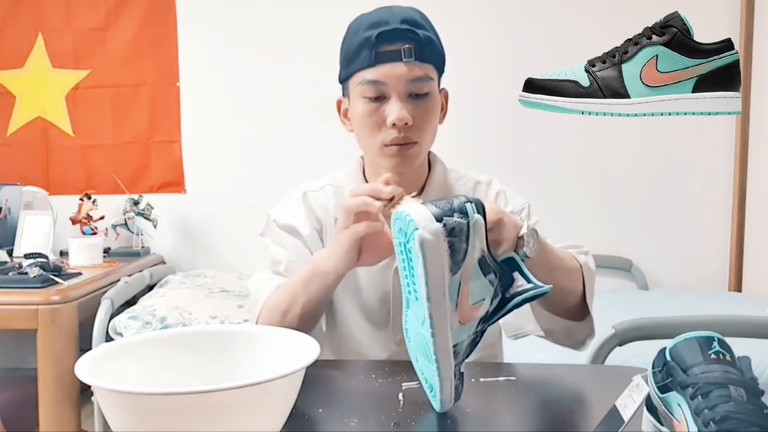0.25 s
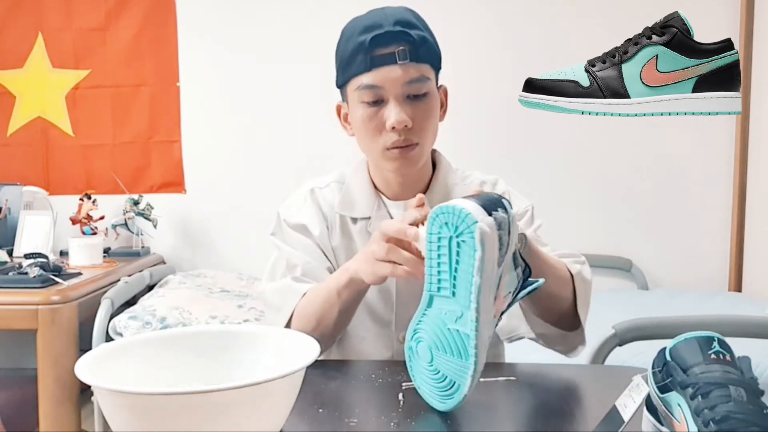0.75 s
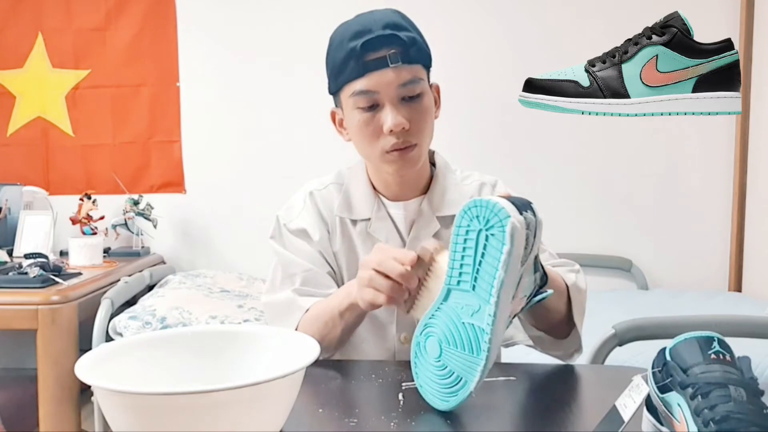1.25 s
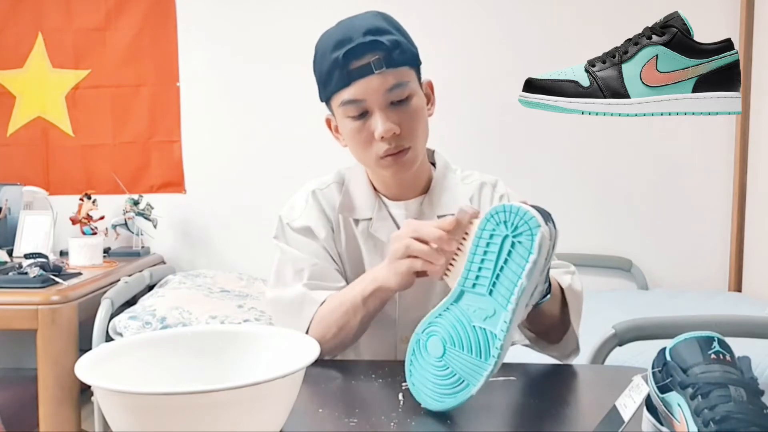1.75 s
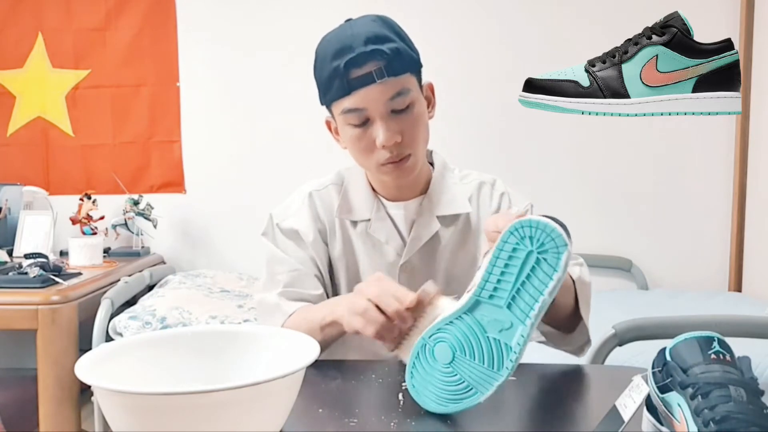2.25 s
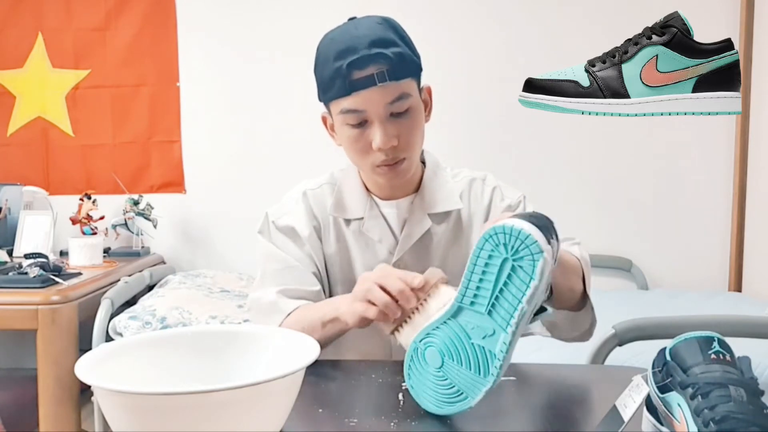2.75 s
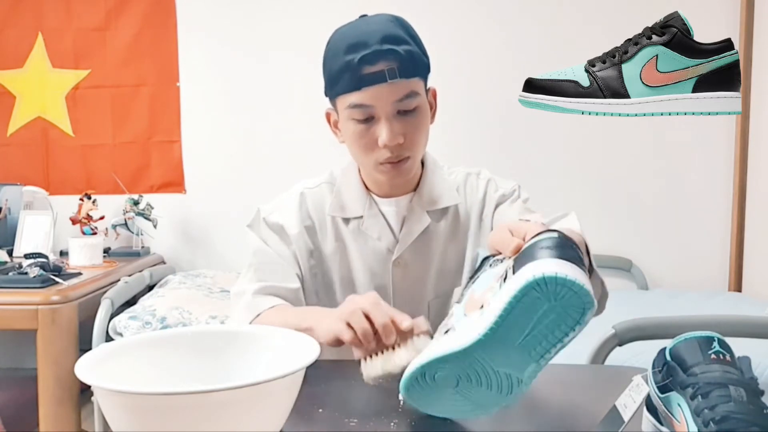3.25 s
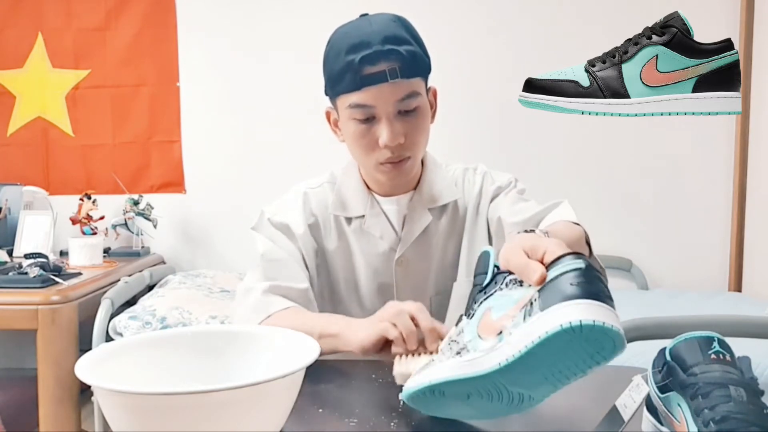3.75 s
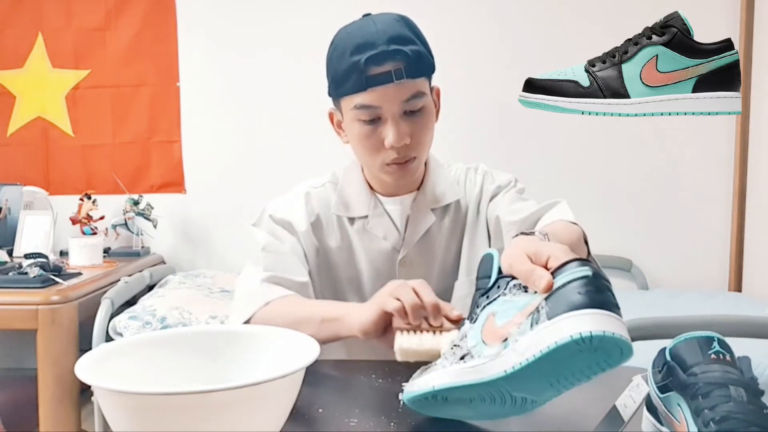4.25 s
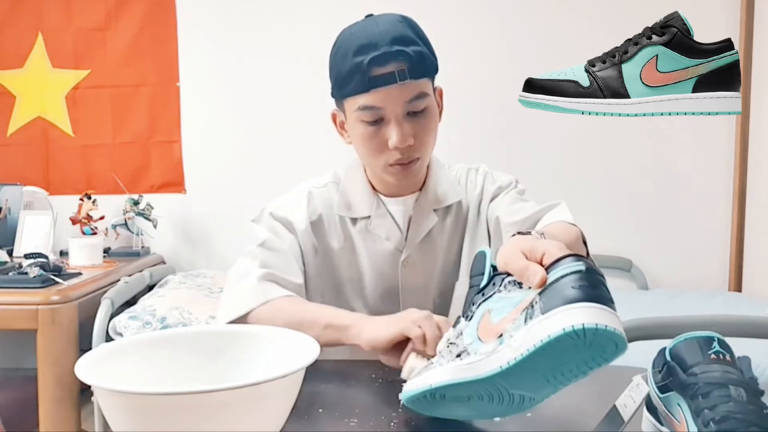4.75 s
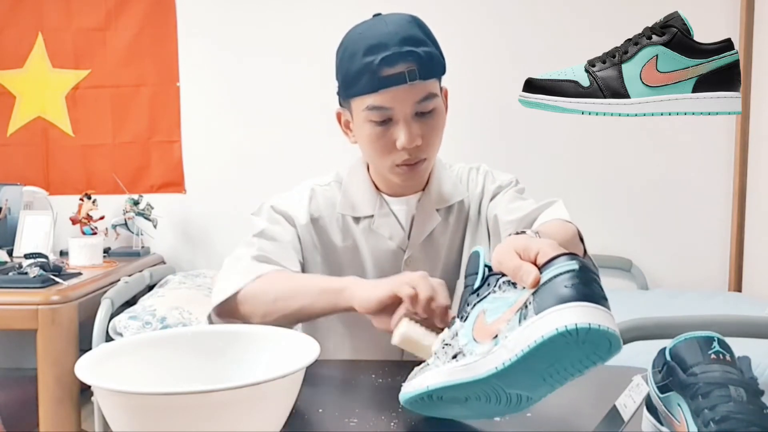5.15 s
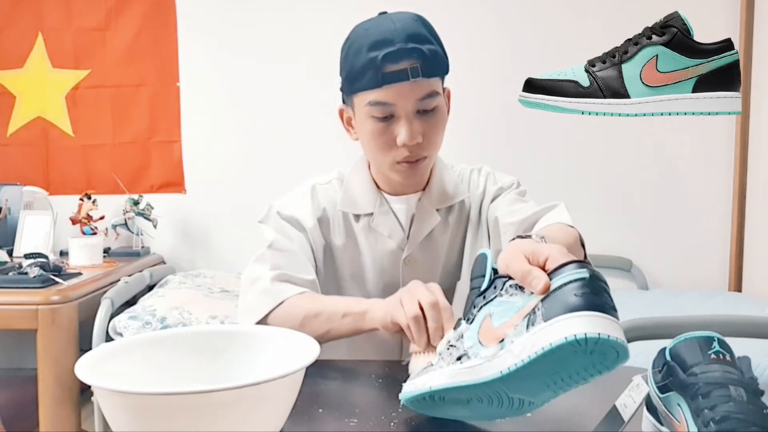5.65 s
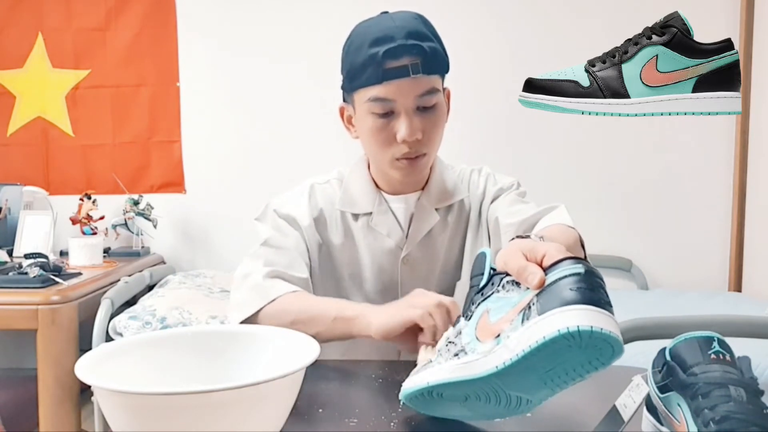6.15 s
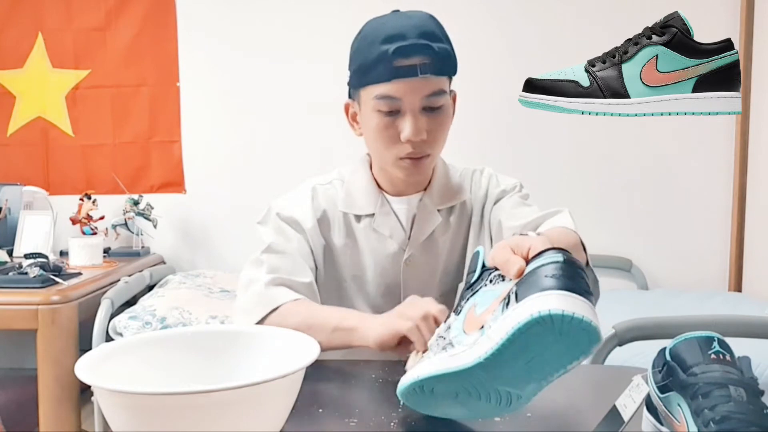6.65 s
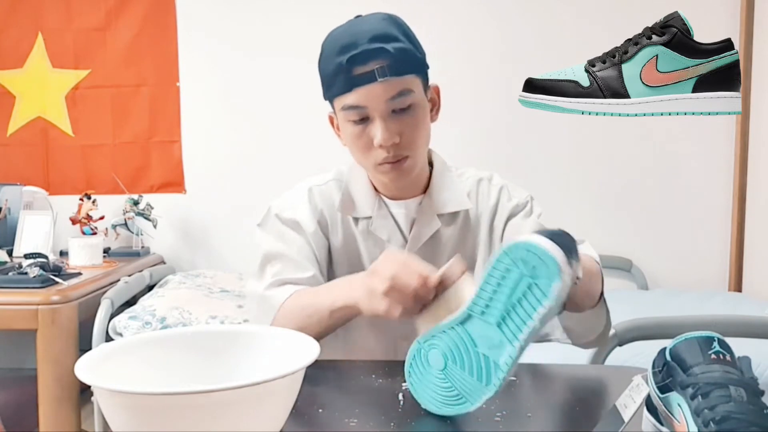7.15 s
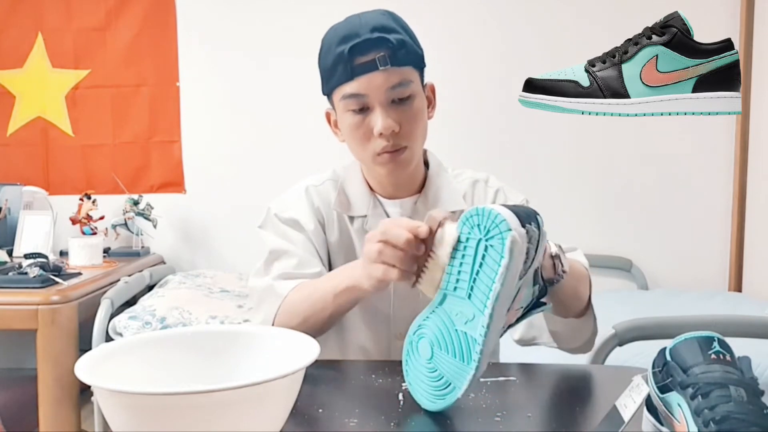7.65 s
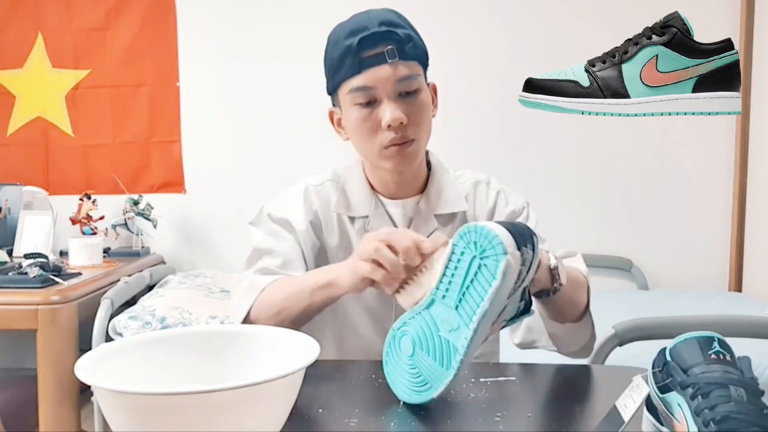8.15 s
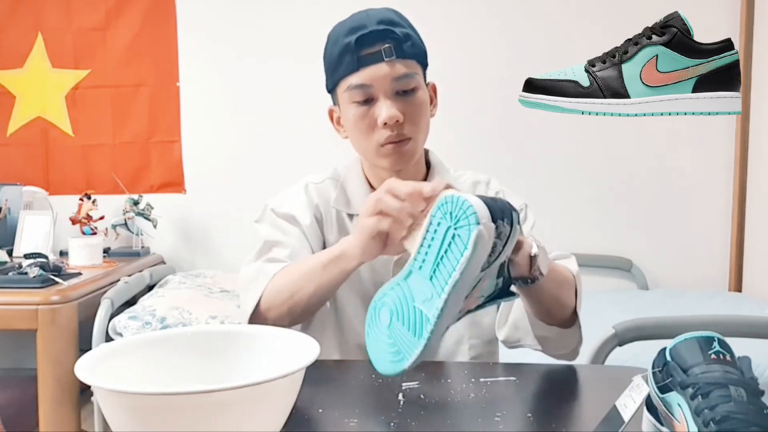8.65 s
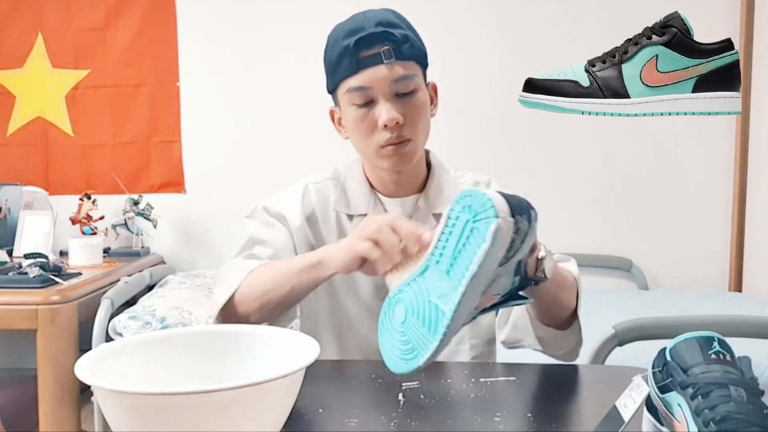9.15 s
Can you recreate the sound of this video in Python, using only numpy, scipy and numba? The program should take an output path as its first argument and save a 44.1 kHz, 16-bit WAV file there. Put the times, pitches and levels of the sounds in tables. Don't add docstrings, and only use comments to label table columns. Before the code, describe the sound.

A stiff wet brush rasps over a rubber-soled shoe, gritty and slightly fizzy, with a hollow body beneath and soft low table rumble. Nearly silent first, then lively strokes with one heavy thump, muffled heel strokes with small clacks, a quieter gappy stretch, and finally crisp vigorous scrubbing. Close and dry in a quiet indoor room, source a little left.

```python
import sys
import numpy as np
from scipy import signal
from scipy.fft import rfft, irfft, next_fast_len
from scipy.io import wavfile
from scipy.ndimage import uniform_filter1d
from numba import njit

SR = 44100
rng = np.random.default_rng(int(sys.argv[2]) if len(sys.argv) > 2 else 0)


def rack_gain(trim_db):
    fader = np.asarray(trim_db, float)
    return 10 ** (fader / 20)


def wrap_up_sound(samples):
    columns = np.atleast_2d(samples).T
    tamed = np.clip(columns, -1, 1)
    steps = np.round(tamed * 32767).astype(np.int16)
    wavfile.write(sys.argv[1], SR, steps)


N = 414981

# (frequency [Hz], density [dB per Hz])
ROOM_AIR = [(30, 8), (300, -15), (700, -61), (1500, -42), (5000, -24), (15000, -47)]
# (time [s], peak [dB], ring [Hz], t60 [s])
SOFT_BUMPS = [(0.002, -59.5, 47.5, 0.3), (0.514, -59, 500, 0.04), (0.807, -56, 490, 0.035),
              (1.682, -42, 303, .12), (1.7, -41, 223, .12), (1.715, -39, 364, 0.13),
              (1.745, -38.5, 490, 0.18), (1.78, -36, 495, 0.055), (2.68, -48, 202, 0.054),
              (3.897, -24, 697, 0.018), (3.921, -26.5, 320, 0.029), (4.227, -33.5, 406, 0.044),
              (4.247, -33.5, 483, 0.064), (4.268, -42, 528, .08), (4.535, -35, 852, 0.047),
              (4.548, -35, 1180, 0.04), (4.601, -41, 320, 0.044), (6.018, -56, 240, 0.092),
              (6.111, -54, 242, 0.067), (6.17, -50, 514, 0.025), (6.187, -44, 400, 0.027),
              (6.567, -43.5, 570, 0.047), (6.58, -46, 394, 0.036), (6.618, -36, 680, 0.025),
              (6.775, -38, 262, 0.029), (6.87, -44, 260, 0.041), (7.233, -45, 360, .05),
              (7.83, -37, 830, 0.048), (7.878, -35, 800, 0.037)]
# (time [s], peak [dB], ring [Hz], t60 [s], crack re ring [dB])
HARD_BUMPS = [
    (2.792, -33, 700, 0.021, -18),
    (3.9015, -28, 341, 0.036, 12),
    (5.689, -37, 372, 0.044, -8),
    (6.2, -41, 457, 0.049, -11),
]
HANDLING_STROKES = [(.04, .08, -84, 13, -10), (.17, .1, -88, 4, -9), (.27, .04, -79, 7, -12),
                    (.325, .045, -72.5, 4, -15), (.385, .045, -78, 8, -9), (.45, .04, -69.5, 6, -13),
                    (.52, .03, -75, 13, -9), (.58, .06, -62.5, 3, -8), (.68, .05, -73, 1, -2),
                    (.75, .05, -71, 5, -4), (.815, .04, -71, 5, -5), (.885, .05, -67, 7, -11),
                    (.98, .05, -71, 8, -11)]
SIDE_STROKES = [(1.118, 0.07, -51, -3.5, -9), (1.292, 0.13, -46.0, -6, -10.5),
                (1.431, 0.088, -39.8, -4, -10.5), (1.607, 0.068, -41, -7, -10.5),
                (1.768, 0.12, -40, -3.0, -10), (1.975, 0.064, -43.5, -2.5, -7.3),
                (2.143, 0.089, -41.5, 0.3, -9), (2.331, 0.054, -46, -4.5, -12),
                (2.475, 0.078, -41.5, -1.5, -8.5), (2.61, 0.068, -53.5, 0.3, -8.5),
                (2.804, 0.07, -43, 2.5, -8), (2.926, 0.097, -50, 1, -8.1), (3.086, 0.05, -43.6, 1, -11),
                (3.196, 0.074, -50, 2, -11.5)]
HEEL_STROKES = [(3.38, 0.064, -50.5, 3, -15), (3.502, 0.07, -48.5, 0.9, -11),
                (3.676, 0.063, -45, 1.5, -14.5), (3.808, 0.066, -47.5, -1, -14.5),
                (3.946, 0.074, -46, 1, -17), (4.1, 0.095, -47.5, .9, -14), (4.303, 0.078, -48, 1.5, -15),
                (4.436, 0.082, -48.5, -0.5, -16), (4.59, .1, -46.5, -0.3, -17), (4.7, 0.11, -53.5, 7, -9.5),
                (4.79, 0.085, -51, -10, -17), (4.898, 0.055, -57, 2, -11)]
SLOW_STROKES = [(5.07, 0.049, -51.5, -1.5, -15.5), (5.13, 0.078, -54, 1, -17), (5.32, 0.085, -66.5, 7, -22),
                (5.451, 0.11, -56, 4.5, -15.5), (5.565, 0.071, -56, 2, -12),
                (5.738, 0.063, -57.5, 5, -18.5), (5.831, .07, -53, 4, -8), (5.908, 0.059, -51, 0.5, -10.5),
                (6.03, 0.034, -72, 1, -14), (6.12, 0.061, -81.5, 3.5, -15), (6.2, 0.022, -74, 18.5, -13),
                (6.302, 0.063, -53.5, 4, -14.5), (6.388, 0.089, -50, -2.5, -17),
                (6.58, 0.038, -67.5, 10, -5.5), (6.657, 0.042, -47, -3.5, -13),
                (6.723, 0.052, -49, -2, -8.5), (6.8, 0.08, -72, 7.5, -11), (6.93, 0.15, -71.5, 9, -6)]
TOE_STROKES = [(7.028, 0.088, -51.5, 2, -3.5), (7.093, 0.056, -39.5, -2, -9.5),
               (7.279, 0.057, -42, -2.5, -7), (7.478, 0.074, -40, -6, -9), (7.707, 0.11, -42, -5, -11),
               (7.825, 0.062, -44.5, -7, -9), (7.902, 0.038, -41, -16, -11.5), (7.992, 0.1, -40, -6, -18),
               (8.101, 0.064, -41.5, -7.5, -16.5), (8.201, 0.14, -44, -13, -13),
               (8.357, 0.083, -39, -8.5, -16), (8.522, 0.077, -40.5, -10, -14.5),
               (8.71, 0.12, -40.5, -6.5, -17), (8.804, 0.073, -42, -23, -13), (8.908, 0.043, -44, -6, -14),
               (9.064, 0.13, -37, -11, -16.5), (9.125, 0.065, -44, -4.5, -9.5),
               (9.27, 0.091, -41.5, -6.5, -14.5), (9.391, 0.058, -40, -9, -18.5)]
# (time [s], bristle ring re scrape [dB], bristle ring [Hz], panel under the brush [Hz],
# panel re cavity [dB], weight of the sole on the table [dB])
BRUSH_PLACE = [(0, -2, 2720, 576, 18, -16.5), (.95, 1, 3020, 476, 34, -20.5), (1.25, 0, 3030, 590, 3, -18),
               (1.45, 2.5, 2950, 470, 8.5, -14.5), (2.1, 1.5, 3150, 497, 1, -13),
               (2.6, 1, 3200, 613, 3, -8.5), (3.1, -4, 3010, 590, -2, -9.5), (3.75, -3, 3030, 647, -1, -14),
               (4.0, -3, 2940, 458, 3, -5.5), (4.45, -6, 3080, 754, -3.5, -17),
               (5.2, -2.5, 3030, 600, -0.5, -17), (5.72, -5, 3160, 435, -1.5, -11),
               (6.7, -7, 3100, 635, 0.5, -8.5), (7.15, 2, 3230, 510, -3, -9.5),
               (7.8, 3, 2950, 670, -5, -15), (8.07, 0, 2760, 403, 11, -6.5),
               (8.3, 0.5, 2790, 480, 12, -21.5), (9.41, 1.5, 2790, 494, 1, -24)]
# (frequency [Hz], density [dB per Hz])
SCRAPE = [(850, 6), (1250, 4.5), (1700, 8.5), (2300, 8), (3300, -9.5), (4500, 2), (6000, -8.5), (8000, -20)]
# (frequency [Hz], density [dB per Hz])
WET_FIZZ = [(4000, 3), (5500, 4.5), (7000, 0), (8500, -7), (11000, -7.5), (13500, -14), (15500, -14.5)]
# (frequency [Hz], width [Hz], level [dB])
SHOE_MODES = [(320, 137, 7.5), (425, 18, -32), (465.3, 25, 11), (570, 17, 7), (680, 200, 4),
              (680, 220, -15.5), (986, 170, -15), (1376, 460, 1)]
# (frequency [Hz], width [Hz], level [dB])
RUBBED_TABLE = [(51.7, 39, -10), (82, 7.5, -2), (119.5, 13.5, -1.5), (151, 22, -4), (240, 91, -6)]
# (time [s], strength [dB])
KNOCKS = [(1.6845, -13), (2.676, -36), (2.822, -39), (2.957, -41), (3.1, -38), (4.545, -43), (4.595, -41),
          (0.57, -54), (2.3, -43), (3.19, -42), (8.05, -42)]
# (frequency [Hz], width [Hz], level [dB], direction [sign])
STRUCK_TABLE = [(48, 4, -24, 1), (87.6, 4.5, -14, -1), (116.8, 9, .5, -1), (160.7, 12.8, -.6, 1),
                (226, 16, -2, -1), (266, 15, 6, 1)]
# (frequency [Hz], level re direct [dB])
SCATTER = [(60, 20), (300, -12.5), (1000, -3), (3000, 0.5), (8000, 6.5), (15000, 16)]
# (frequency [Hz], level re direct [dB])
ECHO = [(60, -24), (300, -17), (1000, -15), (3000, -16), (15000, -20)]

LEFT_DB = 1.4


def rms_one(x):
    return x / np.sqrt(np.mean(x ** 2) + 1e-20)


def colour(x, points, lag_s=0.):
    size = next_fast_len(N + 4096)
    hz = np.arange(size // 2 + 1) * SR / size + 1e-3
    at, db = np.transpose(points)
    octaves_beyond = np.maximum(np.log2(at[0] / hz), 0) + np.maximum(np.log2(hz / at[-1]), 0)
    gain = rack_gain(np.interp(np.log(hz), np.log(at), db) - 24 * octaves_beyond)
    delay = np.exp(-2j * np.pi * hz * lag_s)
    return irfft(rfft(x, size) * gain * delay, size)[..., :N]


def drift(rate):
    r = np.exp(-2 * np.pi * rate / SR)
    noise = rng.standard_normal(N + 8000)
    return rms_one(signal.lfilter([1], [1, -2 * r, r * r], noise)[8000:])


def in_time(rows):
    s, *columns = np.transpose(rows)
    return [np.interp(np.arange(N) / SR, s, c) for c in columns]


def body(force, modes):
    out = 0
    for k, (hz, width, db) in enumerate(modes):
        r = np.exp(-np.pi * width / SR)
        poles = [1, -2 * r * np.cos(2 * np.pi * hz / SR), r * r]
        out = out + (-1) ** k * rack_gain(db) * signal.lfilter([1 - r, 0, r - 1], poles, force)
    return out


@njit
def gliding(x, hz, r, rate):
    y = np.zeros_like(x)
    for i in range(2, len(x)):
        drive = (1 - r[i]) * (x[i] - x[i - 2])
        y[i] = drive + 2 * r[i] * np.cos(2 * np.pi * hz[i] / rate) * y[i - 1] - r[i] * r[i] * y[i - 2]
    return y


def room_air():
    return rack_gain(-79) * rms_one(colour(rng.standard_normal((2, N)), ROOM_AIR))


def bumps():
    out = np.zeros(N + 8192)
    t = np.arange(8192) / SR
    band = signal.butter(5, [500, 3600], "band", fs=SR, output="sos")
    crack = signal.sosfilt(band, 2.4 * (t == 0))
    # crack re ring [dB] (soft only), attack [s], brightness
    soft = [row + (-24, .003, .55) for row in SOFT_BUMPS]
    hard = [row + (.0011, 1) for row in HARD_BUMPS]
    for s, db, hz, t60, crack_db, attack_s, bright in soft + hard:
        overtones = .45 * np.sin(2 * np.pi * 1.7 * hz * t) + .35 * np.sin(2 * np.pi * 2.6 * hz * t)
        ring = np.sin(2 * np.pi * hz * t) + bright * overtones
        envelope = rack_gain(-60 * t / max(t60, .005)) * (1 - np.exp(-t / attack_s))
        out[round(s * SR):][:8192] += rack_gain(db + 4.5) * (ring * envelope + rack_gain(crack_db) * crack)
    return out[:N]


def strokes():
    rows = HANDLING_STROKES + SIDE_STROKES + HEEL_STROKES + SLOW_STROKES + TOE_STROKES
    s, fade_s, db, shoe_db, fizz_db = np.transpose(rows)[:, :, None]
    t = np.arange(0, N + 64, 64) / SR
    haste = np.where(t < s, 1.105, 1 / 1.105)
    fade_db = -10 * np.abs((t - s) / np.clip(fade_s, .02, .15) * haste) ** 1.87
    levels = []
    for re_db, share in ((0, 1), (shoe_db, 0.87), (fizz_db, 1.16)):
        power = np.sum(rack_gain(2 * (db + re_db + share * fade_db)), axis=0)
        levels.append(np.interp(np.arange(N) / SR, t, 10 * np.log10(power + 1e-11)))
    return levels


def slips(per_s, spread_db, clump_db, clump_rate):
    sizes = rack_gain(spread_db * np.minimum(rng.exponential(1, N), 5)) * rng.choice([-1, 1], N)
    let_go = rng.random(N) < per_s / SR
    return sizes * let_go * rack_gain(clump_db * drift(clump_rate))


def bristles(ring_hz, ring_db, fizz_db):
    force = slips(9000, spread_db=1.0, clump_db=0.04, clump_rate=90)
    hz = ring_hz * rack_gain(1.03 * drift(30))
    width_hz = 1200 * (ring_hz / 3000) ** 2.2
    r = np.exp(-np.pi * width_hz / SR)
    once = gliding(force, hz, r, SR)
    ring = rack_gain(ring_db) * rms_one(gliding(once, hz, r, SR))
    scrape = (ring + rms_one(colour(force, SCRAPE))) / np.sqrt(1 + rack_gain(2 * ring_db))
    return scrape + rack_gain(fizz_db + 1.5) * rms_one(colour(force, WET_FIZZ))


def shoe(panel_hz, panel_db):
    small = signal.butter(4, [280, 1700], "band", fs=SR, output="sos")
    drag, rub = (signal.sosfilt(small, slips(2500, spread_db=2.5, clump_db=2.0, clump_rate=10.6))
                 for _ in range(2))
    radius = np.full(N, np.exp(-np.pi * 170 / SR))
    panel = rack_gain(panel_db) * rms_one(gliding(rub, panel_hz, radius, SR))
    return (panel + rms_one(body(drag, SHOE_MODES))) / np.sqrt(1 + rack_gain(2 * panel_db))


def scrub():
    level_db, shoe_db, fizz_db = strokes()
    ring_db, ring_hz, panel_hz, panel_db, _ = in_time(BRUSH_PLACE)
    speed_db = level_db - uniform_filter1d(level_db, size=SR // 2)
    ring_db = ring_db + .3 * speed_db
    panel_hz = panel_hz * rack_gain(.35 * drift(4.0))
    brush = rack_gain(level_db - 1.41) * bristles(ring_hz, ring_db, fizz_db - level_db + 2.5)
    return brush + rack_gain(shoe_db + 0.5) * shoe(panel_hz, panel_db)


def rumble():
    load_db = in_time(BRUSH_PLACE)[-1] - 50 + 0.54 * (strokes()[1] + 50)
    rocking = slips(300, spread_db=2, clump_db=2.0, clump_rate=17)
    return rack_gain(load_db + 4.0) * rms_one(body(rocking, RUBBED_TABLE))


def knocks():
    out = np.zeros(N + SR)
    t = np.arange(SR) / SR
    ring = 0
    for hz, width, db, way in STRUCK_TABLE:
        ring = ring + way * rack_gain(db) * np.exp(-np.pi * width * t) * np.sin(2 * np.pi * hz * t)
    for s, db in KNOCKS:
        out[round(s * SR):][:SR] += rack_gain(db) * ring
    push = signal.windows.gaussian(801, .0017 * SR)
    return signal.fftconvolve(out, push / push.sum(), "same")[:N]


def ports(x):
    late = colour(x, [(1, 0), (SR, 0)], lag_s=6.8e-5)
    return np.array([rack_gain(LEFT_DB / 2) * x, rack_gain(-LEFT_DB / 2) * late])


def scatter():
    return colour(np.array([scrub(), scrub()]), SCATTER) * rack_gain([[LEFT_DB / 2], [-LEFT_DB / 2]])


def surfaces(x):
    t = np.arange(12000) / SR
    shape = (rack_gain(-60 * t / .06) + rack_gain(-18 - 60 * t / .3)) * (t > .0015)
    cloud = rng.standard_normal((2, 12000)) * shape / np.sqrt(np.sum(shape ** 2))
    return signal.fftconvolve(colour(x, ECHO)[None], cloud, axes=1)[:, :N]


def scene():
    direct = scrub() + rumble() + knocks() + bumps()
    return ports(direct) + scatter() + surfaces(direct) + room_air()


def band_limit(x):
    return signal.sosfilt(signal.butter(12, 15780, fs=SR, output="sos"), x)


def record(dry):
    bass_cut = signal.butter(2, 30, "high", fs=SR, output="sos")
    top_cut = signal.ellip(12, .5, 70, 15450, fs=SR, output="sos")
    mix = signal.sosfilt(top_cut, signal.sosfilt(bass_cut, dry))
    return band_limit(mix)


dry = scene()
out = record(dry)
wrap_up_sound(out)
```